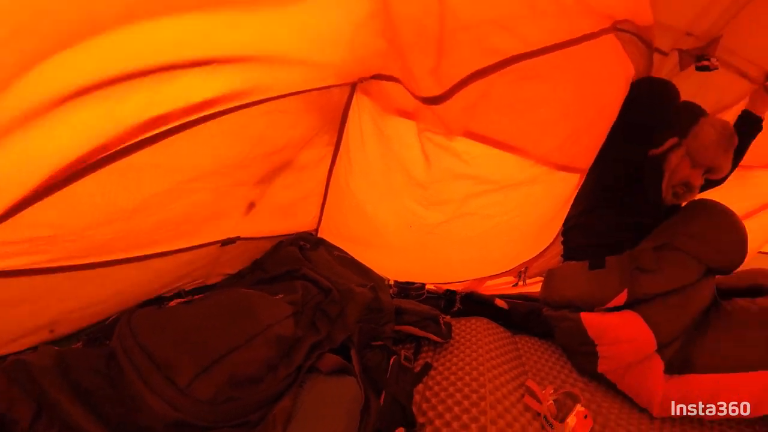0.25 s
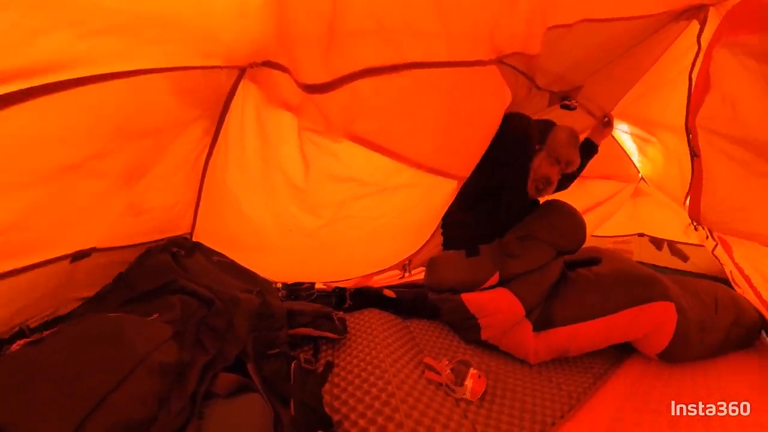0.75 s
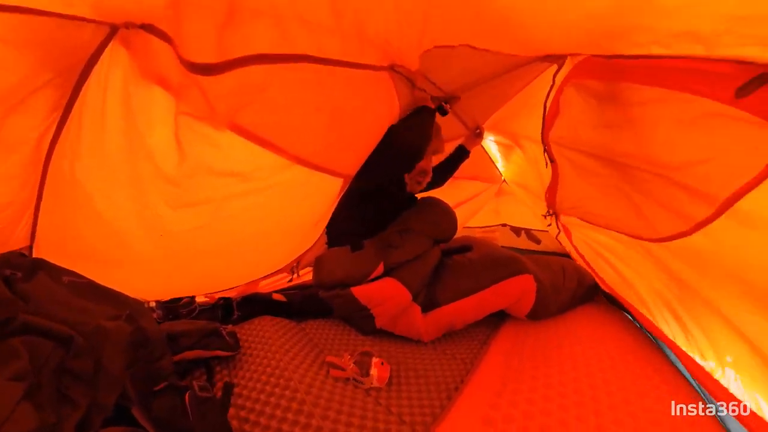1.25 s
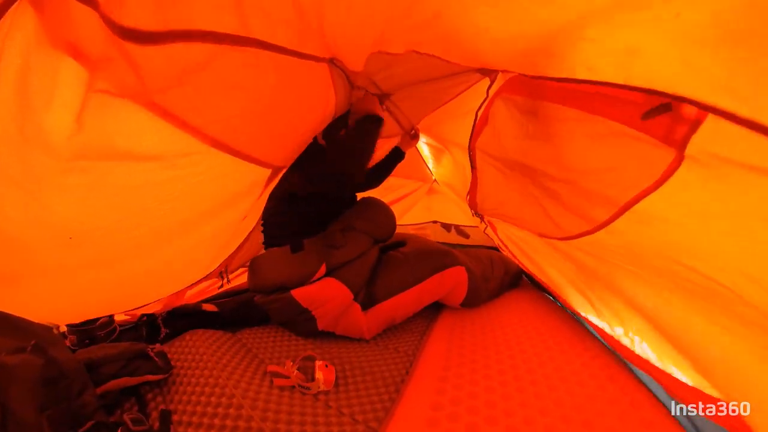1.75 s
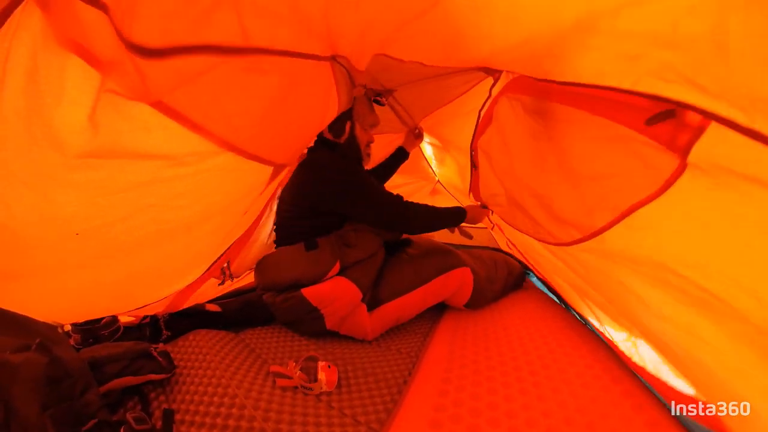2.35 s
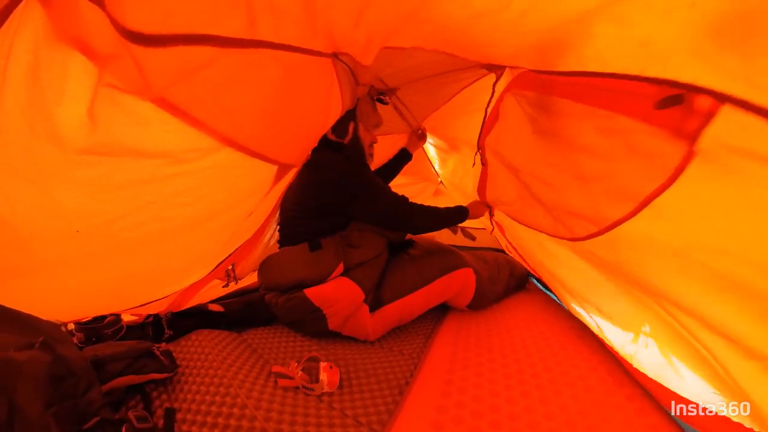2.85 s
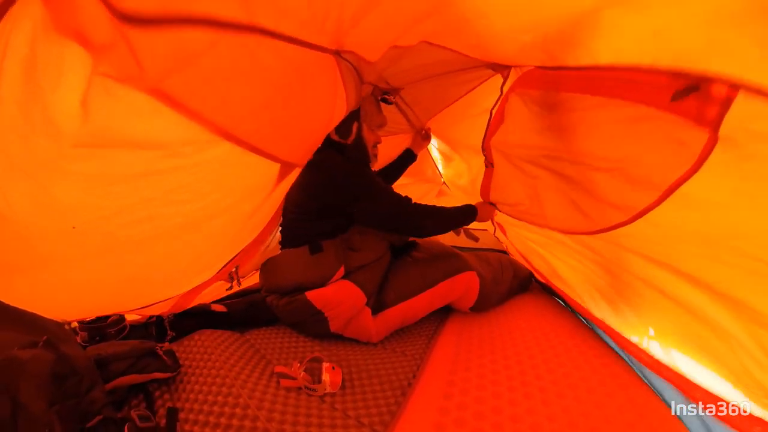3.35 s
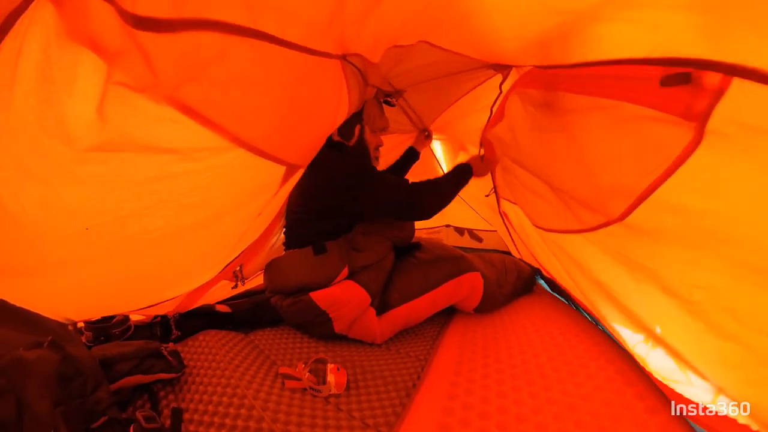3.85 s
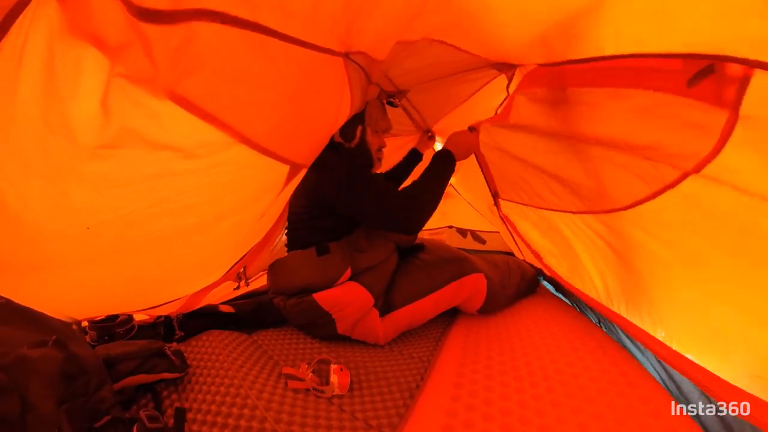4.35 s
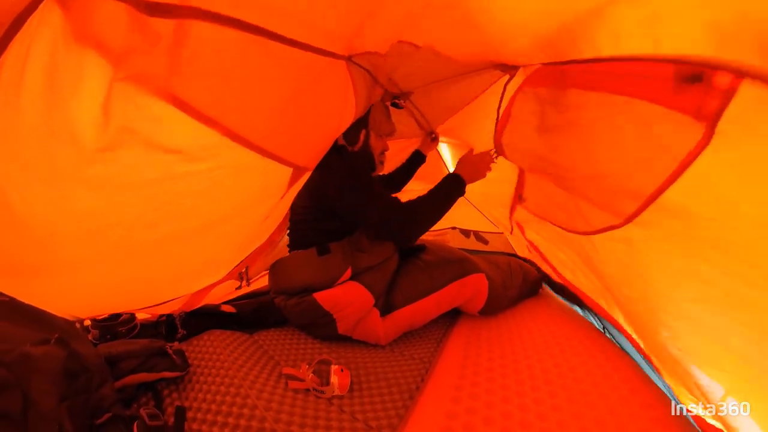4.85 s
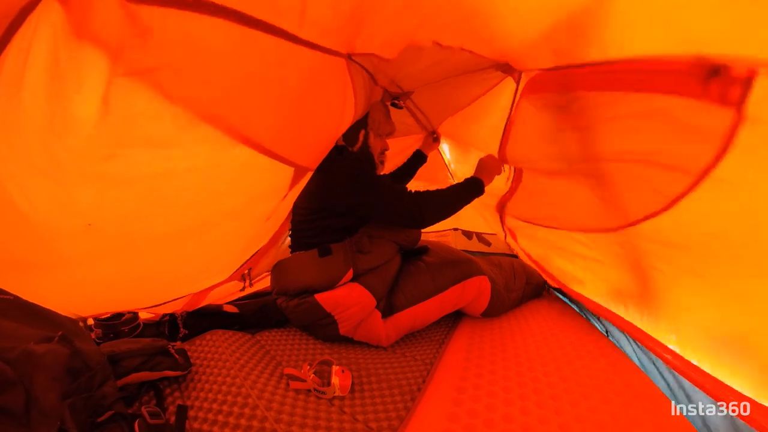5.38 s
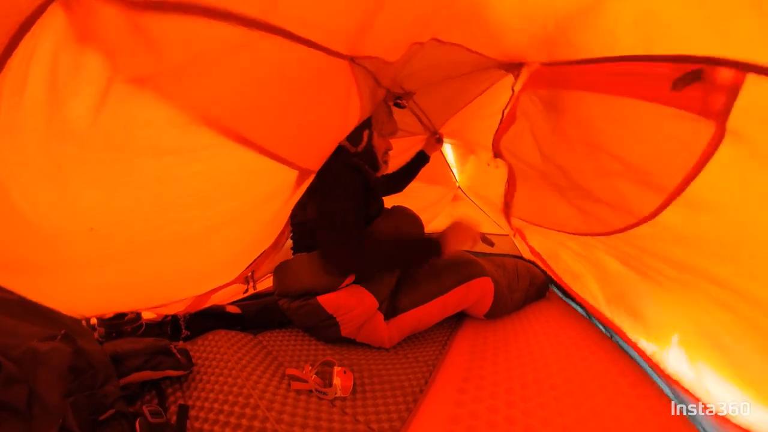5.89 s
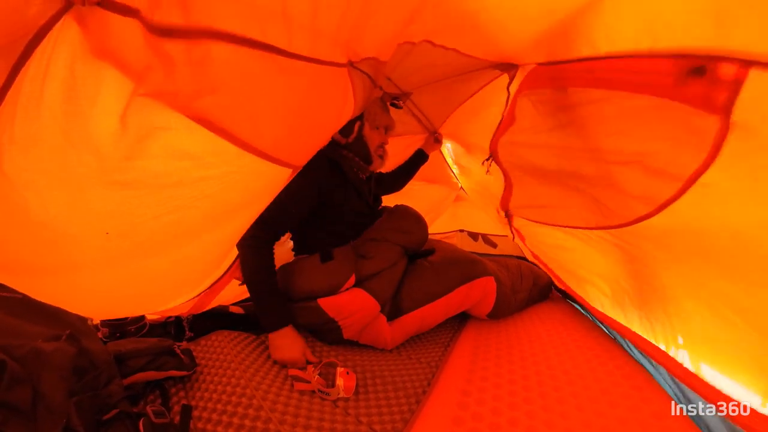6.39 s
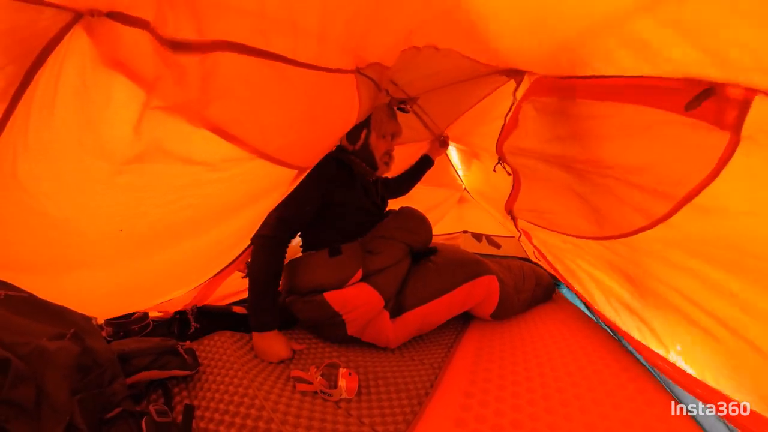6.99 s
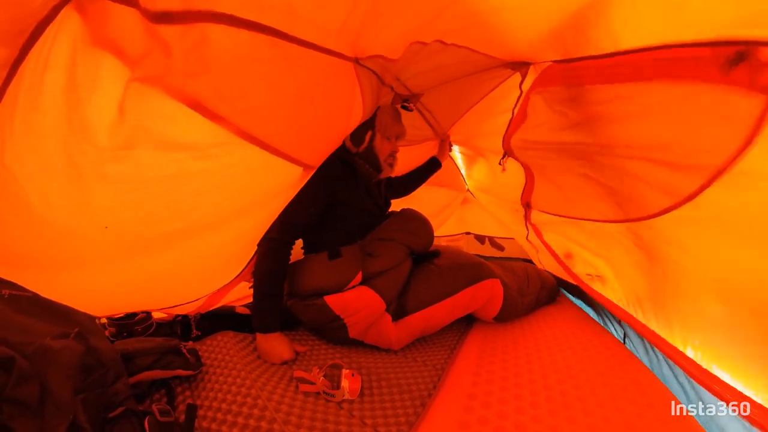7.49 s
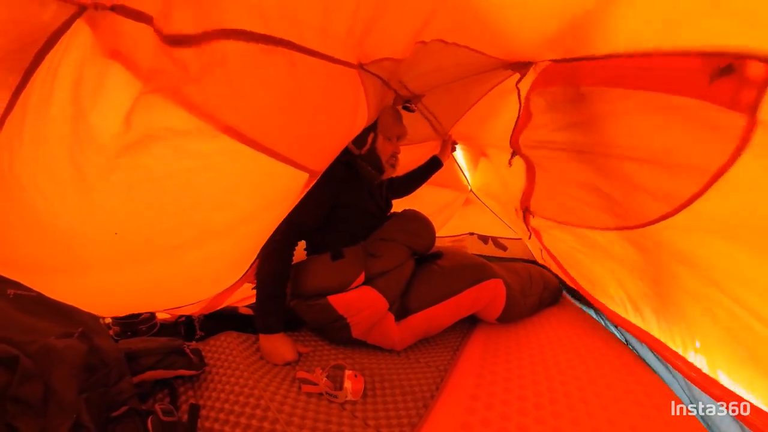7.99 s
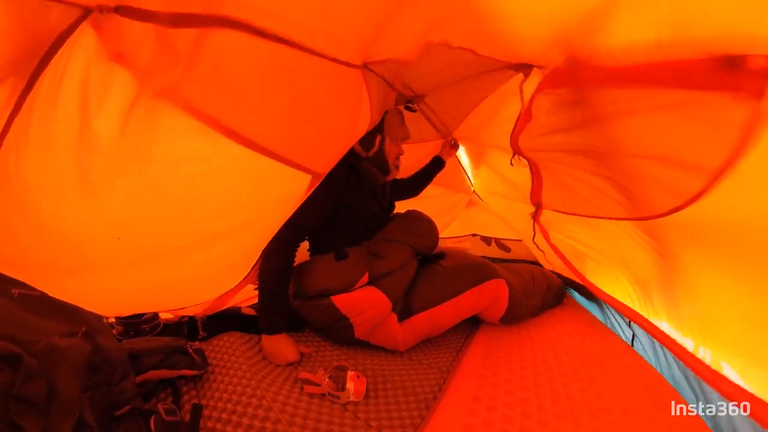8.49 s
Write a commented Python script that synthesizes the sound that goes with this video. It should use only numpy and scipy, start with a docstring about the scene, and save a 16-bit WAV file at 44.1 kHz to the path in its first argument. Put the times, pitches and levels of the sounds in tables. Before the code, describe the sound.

Inside a small tent in a gale, the slack fabric wall flaps about seven times a second. Dry snaps and cracks, soft low thumps of panels pulled taut and short crinkly rasps crowd together unevenly, with split-second hushes between. Low buffeting, faint wind rush and hiss lie beneath. The microphone is close, dry and slightly dull on top, with the flapping central and only the hiss wide.

```python
"""Gale on a small tent, heard from inside

The slack wall buffets and crinkles, rasping about seven times a second: noise mixed with random jerks, coloured
and swollen unevenly, with tiny ringing pops for the creases. Panels thrown taut thump as short pressure pulses
on a damped air spring. Folds whip open with dry snaps, each a knock, a crack and a rattle. Random ticks, low
rumble and a rush of wind fill in, and a hiss from 3 to 6 kHz spreads wide."""
import sys
import numpy as np
from scipy import signal
from scipy.fft import rfft, irfft
from scipy.io import wavfile

SR = 44100
rng = np.random.default_rng(int(sys.argv[2]) if len(sys.argv) > 2 else 0)


def waveform_to_disk(signal):
    """Save audio, clipped to [-1, 1], as 16-bit WAV at the path in sys.argv[1]."""
    frames = np.transpose(np.atleast_2d(signal))
    scaled = np.clip(frames, -1, 1) * 32767
    samples = np.round(scaled).astype(np.int16)
    wavfile.write(sys.argv[1], SR, samples)


N = 384993

# Panels thrown taut: strike_s, relative_peak_db, sharpness_hz
PANEL_THUMPS = [(0.0245, -10.5, 327.0), (0.3486, -8, 262.0), (0.4886, -8.5, 334.0), (0.7205, -18.5, 110),
                (0.757, -12.5, 397.0), (0.961, -16, 118.0), (1.0606, -13, 110.0), (1.133, -10, 188.0),
                (1.4228, -11.5, 230.0), (1.5873, -11, 196.0), (2.0079, -11, 306.0), (2.0651, -9.5, 320.0),
                (2.3129, -9.5, 106.0), (2.4591, -13.5, 260.0), (2.7224, -13.5, 260.0), (2.9835, -11, 226.0),
                (3.2047, -10.5, 186.0), (3.6388, -8.5, 342.0), (3.684, -9, 188.0), (3.869, -9.5, 167.0),
                (4.054, -12, 148.0), (4.1944, -12.5, 196.0), (4.4005, -16, 180), (4.589, -12, 420.0),
                (4.8683, -12, 107.0), (4.9962, -12.5, 130.0), (5.0818, -13.5, 350.0), (5.1781, -13, 306.0),
                (5.4263, -8, 327.0), (5.5102, -9.5, 327.0), (5.904, -17, 130.0), (5.989, -5, 359.0),
                (6.2053, -11.5, 150.0), (6.5257, -16, 150.0), (6.649, -12, 150.0), (6.7287, -10.5, 294.0),
                (6.8646, -10, 267.0), (7.1344, -9.5, 277.0), (7.2805, -14, 300), (7.2882, -13.5, 143.0),
                (7.6138, -5.5, 300.0), (7.728, -16.5, 155.0), (7.903, -14.5, 137.0), (7.9299, -12, 90.0),
                (8.0418, -12.5, 262.0), (8.105, -14, 432.0), (8.2038, -15, 148), (8.375, -15, 204.0),
                (8.645, -15, 313.0)]
# Folds whipping open: snap_s, relative_knock_db, relative_crack_db
FOLD_SNAPS = [(0.1486, -16.5, -26), (0.176, -35, -19.5), (0.3444, -13.5, -25), (0.4269, -51, -15),
              (0.736, -14.5, -27), (0.7507, -16, -27), (0.8837, -23, -25.5), (1.0813, -11, -6.5),
              (1.371, -12, -23), (1.405, -15, -16), (1.4369, -14.5, -28), (1.4909, -19, -48),
              (1.5651, -24, -22.5), (1.8512, -7, -34), (1.875, -17, -16.5), (2.1725, -20, -15.5),
              (2.31, -7.5, -26), (2.4584, -9.5, -24), (2.544, -18, -10.5), (2.5536, -15, -31),
              (2.589, -8.5, -17), (2.674, -13, -21.5), (2.7213, -15.5, -19.5), (2.7966, -20, -18),
              (2.836, -12.5, -27), (2.94, -5, -11.5), (3.049, -11, -27), (3.103, -14, -21),
              (3.1558, -13, -27), (3.1635, -12.5, -27), (3.6491, -3.5, -25), (3.817, -9.5, -21.5),
              (3.9389, -34, -17.5), (3.9809, -19, -44), (4.036, -12, -18.5), (4.0499, -7.5, -17),
              (4.119, -32, -20), (4.187, -7.5, -24.5), (4.3914, -3, -28), (4.5888, -22, -20),
              (4.6826, -13, -30), (4.7108, -22, -31), (4.8184, -5.5, -12), (4.842, -37, -18),
              (4.8655, -12.5, -26), (4.9612, -10, -22.5), (5.0815, -15.5, -17.5), (5.173, -14, -24),
              (5.2301, -14.5, -39), (5.4144, -25, -17.5), (5.4688, -20, -35), (5.51, -16.5, -26),
              (5.5517, -26, -33), (5.569, -16, -35), (5.7634, -10.5, -26), (5.811, -7.5, -49),
              (5.9003, -8, -39), (5.92, -15.5, -15), (5.934, -10, -48), (5.9895, -5, -55),
              (6.237, -28, -19), (6.3113, -48, -4), (6.418, -8, -48), (6.4857, -14.5, -25.5),
              (6.5244, -27, -19), (6.6467, -10, -30), (6.727, -15.5, -27), (6.8492, -20, -18.5),
              (6.9338, -18, -17.5), (6.9534, -9, -22), (7.0138, -9, -51), (7.1335, -18, -18.5),
              (7.2884, -3.5, -19), (7.6128, -13.5, -22.5), (7.7144, -11.5, -17.5), (7.779, -8.5, -20.5),
              (8.0903, -34, -25), (8.1054, -1.5, -32), (8.168, -23, -23), (8.1946, -17, -19),
              (8.2078, -22, -25), (8.275, -35, -18.5), (8.3726, -14, -30), (8.4264, -14, -13),
              (8.4466, -11, -20), (8.5188, -23, -19), (8.706, -40, -12.5)]
# Bursts of rasping as creases run through the cloth: middle_s, relative_level_db, length_s, brightness_db
CREASE_RASPS = [(0.01, -39.5, 0.012, -5), (0.174, -32.5, 0.014, 3), (0.337, -36.0, 0.0073, -3),
                (0.751, -31.5, 0.0061, -2), (0.827, -42, 0.012, -1), (0.901, -39.5, 0.017, -0.0),
                (1.129, -40.5, 0.0093, -3), (1.3, -49.5, 0.055, 5.5), (1.397, -38.5, 0.054, -1.5),
                (1.559, -35.0, 0.011, -3), (1.831, -37, 0.066, -2), (2.031, -34.5, 0.019, 3.5),
                (2.164, -28, 0.0018, 3), (2.295, -38, 0.027, -5), (2.425, -39, 0.018, 9.5),
                (2.574, -34.0, 0.012, 4), (2.693, -31.5, 0.0035, 3), (2.829, -40, 0.0038, 1.0),
                (2.943, -41.5, 0.032, -5), (3.083, -30.5, 0.012, 0), (3.171, -44, 0.011, -5),
                (3.364, -34, 0.011, -2.5), (3.627, -33, 0.005, 10), (3.817, -41.5, 0.024, -3.0),
                (3.942, -33.5, 0.017, -6.5), (3.99, -37, 0.019, -4.5), (4.184, -36.0, 0.0095, -1),
                (4.367, -39.5, 0.02, 5), (4.577, -33.5, 0.0074, 3), (4.706, -34.5, 0.018, -3.5),
                (4.8, -42, 0.027, -0.0), (4.846, -39, 0.012, 3), (4.985, -40, 0.017, 4),
                (5.073, -39.5, 0.0065, -8), (5.171, -33.5, 0.021, -6.5), (5.287, -37, 0.078, 0.5),
                (5.683, -45.5, 0.038, -9), (5.813, -41.0, 0.02, 6), (5.93, -31.5, 0.0074, -1),
                (5.958, -34, 0.0055, -6), (6.181, -44, 0.059, -3.5), (6.237, -36.0, 0.053, 6.5),
                (6.331, -36.5, 0.036, 0.5), (6.428, -40.5, 0.05, -1), (6.523, -30.5, 0.0034, -6),
                (6.628, -37, 0.035, -2), (6.723, -36.5, 0.01, 11), (6.842, -39.5, 0.02, 9),
                (6.95, -39.5, 0.028, 3), (7.047, -35, 0.025, 0), (7.413, -32, 0.0056, -0.5),
                (7.511, -42, 0.005, 18), (7.716, -37, 0.0081, 8), (7.806, -41.5, 0.022, -11),
                (7.929, -35.5, 0.0047, -4.0), (8.026, -40, 0.023, -7), (8.188, -37, 0.014, 3),
                (8.283, -40.5, 0.016, -3.5), (8.369, -41, 0.015, 9), (8.449, -35.5, 0.026, -2.5),
                (8.545, -34.5, 0.033, 12.5), (8.635, -33, 0.06, 0)]
# Wind strength between flaps: time_s, relative_buffet_db, relative_crinkle_db
WIND_GUSTS = [(0.0, -36.5, -49), (0.95, -31, -54.5), (1.92, -32.5, -48.5), (2.14, -39, -52),
              (3.01, -33.5, -44), (3.21, -34.5, -55), (3.77, -33.5, -44), (4.35, -29, -52.5),
              (5.15, -37.5, -50.5), (6.15, -32.5, -49), (7.03, -38.5, -55.5), (7.78, -30, -47),
              (8.24, -37, -54), (8.73, -33.5, -45)]
# Wall stays taut and goes quiet, then slackens again: start_s, depth_db, recovery_s
TAUT_LULLS = [(0.04, 17, 0.059), (1.13, 16.5, 0.61), (2.08, 11, 0.074), (2.74, 11.5, 0.15),
              (3.21, 17.5, 0.13), (3.702, 15.5, 0.091), (4.07, 11, 0.15), (4.21, 14, 0.14),
              (4.609, 21, 0.053), (5.518, 18, 0.14), (5.72, 21, 0.069), (6.0, 12.5, 0.46),
              (7.15, 10, 0.053), (8.11, 9.5, 0.095), (8.22, 20, 0.033)]
# Colour of the low buffeting: frequency_hz, relative_level_db (per Hz)
BUFFET_COLOUR = [(20, -29.5), (48, -2.5), (87, 2), (200, -8.5), (500, -14), (1200, -28), (3000, -39.5)]
# Colour of the bright crinkle and the rush: frequency_hz, relative_level_db (per Hz)
CRINKLE_COLOUR = [(300, 10.5), (800, 4), (1700, -6), (3500, -7), (5800, -15), (8000, -4.5)]
# Colour of the wind pressure on the whole tent: frequency_hz, relative_level_db (per Hz)
RUMBLE_COLOUR = [(20, -13), (45, -5.5), (80, -10), (150, -20.5), (300, -50.5)]

CUTOFF_HZ = 9700
HUSH_S, LULL_LOW_SHARE = 0.014, 0.61  # time constant of going quiet; share of the depth felt by the buffeting
# Each rasp heaves the panel: level offset, share of the rasp's level swing, delay and added length
HEAVE_ABOVE_DB, HEAVE_FOLLOWS, HEAVE_LAG_S, HEAVE_EXTRA_S = 8.5, 0.55, 0.007, 0.013


def amp(db):
    """Decibels to gain."""
    return 10 ** (np.asarray(db) / 20)


def rms_one(x):
    """Scale to unit rms."""
    return x / np.sqrt(np.mean(x ** 2) + 1e-20)


def drift(rate_hz):
    """Slow chance of unit rms: noise twice through a one-pole low-pass, made at a tenth of the rate."""
    r = np.exp(-20 * np.pi * rate_hz / SR)
    noise = rng.standard_normal(N // 10 + 4002)
    slow = signal.lfilter([1], [1, -2 * r, r * r], noise)[4000:]  # drop the settling
    return np.interp(np.arange(N) / 10, np.arange(len(slow)), rms_one(slow))


def grains(per_s, spread_db):
    """Random clicks of either sign, mostly small, a few large, with unit rms."""
    sizes = amp(spread_db * np.minimum(rng.exponential(1, N), 3))
    signed = sizes * rng.choice([-1, 1], N)
    return rms_one(signed * (rng.random(N) < per_s / SR))


def coloured(x, spectrum):
    """Give a white signal the spectrum, causally (minimum phase), with unit rms."""
    size = 2 ** 14
    hz, level_db = np.transpose(spectrum)
    grid_hz = np.maximum(np.arange(size // 2 + 1) * SR / size, 1)
    grid_db = np.interp(np.log(grid_hz), np.log(hz), level_db)
    cepstrum = irfft(np.log(amp(grid_db)))
    # Fold the cepstrum forward in time for minimum phase
    cepstrum[1:size // 2] *= 2
    cepstrum[size // 2:] = 0
    impulse = irfft(np.exp(rfft(cepstrum)))
    return rms_one(signal.fftconvolve(x, impulse)[:N])


def add(out, s, sound):
    """Mix in a short sound; out has a 200-sample lead-in, so the sound's sample 200 falls at time s."""
    at = round(s * SR)
    out[at:at + len(sound)] += sound


def shaken_cloth(level_db, spectrum, per_s, spread_db, grain_share, flicker_db):
    """Air noise mixed with small jerks of the cloth, swelling unevenly."""
    air = np.sqrt(1 - grain_share) * rng.standard_normal(N)
    jerks = np.sqrt(grain_share) * grains(per_s, spread_db)
    return amp(level_db) * coloured((air + jerks) * amp(flicker_db), spectrum)


def buffet_level(calm_db):
    """The low buffeting between flaps, heaving with every rasp; dB."""
    power, t = amp(2 * calm_db), np.arange(N) / SR
    for s, level_db, length, _ in CREASE_RASPS:
        near = slice(max(round((s - .15) * SR), 0), round((s + .2) * SR))
        late = t[near] - s - HEAVE_LAG_S
        lean = np.where(late < 0, 3, 1.5)  # comes faster than it goes
        heave_db = HEAVE_FOLLOWS * (level_db + 36) - 36 + HEAVE_ABOVE_DB
        power[near] += amp(2 * heave_db) * np.exp(-(lean * late / (length + HEAVE_EXTRA_S)) ** 2)
    return 10 * np.log10(power)


def buffeting(buffet_db, gusts):
    """The slack wall beats the air: low noise and jerks that swell with the gusts, within limits."""
    flicker_db = 5.9 * np.tanh(.5 * gusts + 0.34 * drift(18.0))
    return shaken_cloth(buffet_db + 2.5, BUFFET_COLOUR, per_s=250.0, spread_db=3.5,
                        grain_share=0.44, flicker_db=flicker_db)


def crinkle_level(slack_db):
    """Crinkle between flaps, each rasp swelling out in its own colour; level dB, brightness dB."""
    power, bright, t = amp(2 * slack_db), np.zeros(N), np.arange(N) / SR
    for s, level_db, length, bright_db in CREASE_RASPS:
        near = slice(max(round((s - .15) * SR), 0), round((s + .15) * SR))
        lean = np.where(t[near] < s, 2.2, .75)  # a rasp starts faster than it dies
        shape = np.exp(-.9 * np.abs(2 * lean * (t[near] - s) / length) ** 1.24)
        swell = amp(2 * level_db) * shape
        power[near] += swell
        bright[near] += bright_db * swell
    return 10 * np.log10(power), bright / power


def crinkling(crinkle_db, flicker_db):
    """The cloth rubs and creases: bright noise and jerks that flicker fast."""
    return shaken_cloth(crinkle_db + 6.5, CRINKLE_COLOUR, per_s=800.0, spread_db=6.0,
                        grain_share=0.36, flicker_db=flicker_db)


def crackle(level_db, per_s, spread_db, tilt_db, cycles):
    """Tiny creases pop all over the cloth, each at one of eight pitches, ringing a cycle or so."""
    pops, dealt, out = grains(per_s, spread_db), rng.integers(0, 8, N), 0
    for k, hz in enumerate(np.geomspace(400, 6000, 8)):
        r, w = np.exp(-hz / cycles / SR), 2 * np.pi * hz / SR
        struck = pops * (dealt == k) + 1e-18
        ring = signal.lfilter([np.sin(w)], [1, -2 * r * np.cos(w), r * r], struck)
        out = out + amp(tilt_db * k) * ring
    return amp(level_db) * rms_one(out)


def patchy(x, bright_db, patch_db, rate_hz):
    """The rasping shifts colour: four bands tilt with brightness and swell and fade independently."""
    out, rest = 0, x
    for edge_hz, share in ((900, -1), (1900, -0.067), (3800, 0.81)):
        below = signal.lfilter(*signal.butter(1, edge_hz, fs=SR), rest)
        out = out + below * amp(share * bright_db + patch_db * drift(rate_hz))
        rest = rest - below
    return out + rest * amp(.5 * bright_db + patch_db * drift(rate_hz))


def lull_level():
    """A taut wall hushes: each lull drops fast, lingers and climbs back; dB."""
    out, t = np.zeros(N), np.arange(N) / SR
    for s, depth_db, recovery in TAUT_LULLS:
        near = slice(round(s * SR), round((s + recovery) * SR))
        late = np.maximum(t[near] - s, 0)
        drop = 1 - np.exp(-late / HUSH_S)
        climb = 1 - (late / recovery) ** 1.42
        out[near] -= depth_db * drop * climb
    return out


def thumps(rebound_hz, damping):
    """A panel bulges in, then jerks out, pulling air quickly; the tent's air spring swings back slowly."""
    out, t = np.zeros(N + 600), (np.arange(600) - 200) / SR
    for s, peak_db, hz in PANEL_THUMPS:
        pull = np.exp(-np.abs(t * hz * np.where(t < 0, 12, 6)) ** 1.5)  # quicker to come than to go
        bulge = .3 * np.exp(-(4 * t * hz + 1) ** 2)
        add(out, s, amp(peak_db + 0.5) * (bulge - pull))
    w = 2 * np.pi * rebound_hz
    spring = signal.bilinear([1, 0, 0], [1, 2 * damping * w, w * w], SR)
    return signal.lfilter(*spring, out[200:N + 200])


def snaps():
    """A fold knocks for about a cycle and cracks needle-sharp, repeats unevenly, and rattles."""
    out, t = np.zeros(N + 1200), (np.arange(1200) - 200) / SR
    after = np.maximum(t, 0)
    for s, knock_db, crack_db in FOLD_SNAPS:
        chance = rng.standard_normal(3)
        slips, hiss = rng.standard_normal((2, len(t)))
        knock_hz, crack_hz = [900, 4700] * amp(1.5 * np.clip(chance[:2], -2, 2))
        # A fold with little crack knocks deeper
        knock_hz *= amp(0.08 * np.clip(crack_db - knock_db + 9, -25, 0))
        lean = np.where(t < 0, 3.5, 1.8)  # a sharp push, a longer pull
        knock = -np.sin(2 * np.pi * knock_hz * t) * np.exp(-(t * knock_hz * lean) ** 2)
        crack = -np.sin(2 * np.pi * crack_hz * t) * np.exp(-(t * crack_hz * 2.33) ** 2)
        blow = amp(knock_db - 4.0) * knock + amp(crack_db + 3.5) * crack
        # Rare random slips repeat the blow, fading as the fold runs out
        fade = np.exp(-np.arange(len(t)) / SR / 0.0037) * amp(-6.5)
        repeats = np.sign(slips) * (np.abs(slips) > 2.6) * fade
        repeats[0] = 1
        dull = rms_one(signal.lfilter(*signal.iirpeak(1.77 * knock_hz, 1.0, SR), hiss))
        bright = rms_one(signal.lfilter(*signal.iirpeak(crack_hz, 0.8, SR), hiss))
        rattle = dull * amp(knock_db - 19.5) + bright * amp(crack_db - 14.5)
        # The cloth starts to rasp just before it snaps
        decay_s = 0.0031 * amp(2 * chance[2])
        swell = np.exp(-after / decay_s + np.minimum(t, 0) / 0.00033)
        add(out, s, np.convolve(blow, repeats)[:len(t)] + rattle * swell)
    return out[200:N + 200]


def ticks(level_db, per_s, spread_db, rattle_s):
    """Lesser folds flick open at random: a sharp start, then a short rattle, in three colours."""
    out, r = 0, np.exp(-1 / (rattle_s * SR))
    for band_hz in ([700, 2800], [1500, 2070], [3000, 16000]):
        flicks = np.abs(grains(per_s / 3, spread_db)) + 1e-18
        swell = signal.lfilter([1], [1, -r], flicks)
        rattle = swell * rng.standard_normal(N)
        out = out + rms_one(signal.lfilter(*signal.butter(1, band_hz, "band", fs=SR), rattle))
    return amp(level_db) * rms_one(out)


def wind_rumble(buffet_db):
    """Wind pressure on the whole tent: deep noise that follows the buffeting level."""
    return amp(buffet_db - 4.0) * coloured(rng.standard_normal(N), RUMBLE_COLOUR)


def wind_rush(slack_db):
    """Wind streaming past outside: crinkle-coloured noise that moves less than the cloth."""
    return amp(0.56 * (slack_db + 51.5) - 59.0) * coloured(rng.standard_normal(N), CRINKLE_COLOUR)


def wide_hiss(crinkle_db, flicker_db):
    """Band noise around 3 to 6 kHz, flickering with the crinkle and following half its level in dB."""
    band = signal.cheby2(8, 50, [2900, 6400], "band", fs=SR, output="sos")
    hiss = signal.sosfilt(band, rng.standard_normal(N) * amp(flicker_db))
    return rms_one(hiss) * amp(.5 * crinkle_db - 38)


def scene():
    """Cloth, thumps, snaps and ticks over rumble and rush in the middle; only the hiss has width."""
    s, calm_db, slack_db = np.transpose(WIND_GUSTS)
    t, lull_db = np.arange(N) / SR, lull_level()
    calm_db = np.interp(t, s, calm_db)
    slack_db = np.interp(t, s, slack_db) + lull_db
    buffet_db = buffet_level(calm_db + LULL_LOW_SHARE * lull_db)
    crinkle_db, bright_db = crinkle_level(slack_db)
    gusts = drift(55.0)  # the whole wall shudders together
    flicker_db = 2 * gusts + 2 * drift(130.0)

    buffet = buffeting(buffet_db, gusts)
    crinkle = crinkling(crinkle_db, flicker_db)
    pops = crackle(crinkle_db + 3.0 + 2.0 * gusts, per_s=900.0, spread_db=6.0, tilt_db=-1.0, cycles=1.1)
    cloth = patchy(crinkle + pops + wind_rush(slack_db), bright_db, patch_db=4.0, rate_hz=19.0)
    strikes = thumps(rebound_hz=67.0, damping=0.34) + snaps()
    tick_db = 0.85 * (crinkle_db + 44.5) - 47.0
    flicks = ticks(tick_db, per_s=120.0, spread_db=5.5, rattle_s=0.0026)
    mid = buffet + cloth + strikes + flicks + wind_rumble(buffet_db)
    side = wide_hiss(crinkle_db, flicker_db)
    return mid + side * np.array([[1], [-1]])  # opposite polarity left and right


def record(dry):
    """The microphone rolls off steeply above the presence range; the top is cut."""
    dull = signal.sosfilt(signal.butter(10, 6400, fs=SR, output="sos"), dry)
    return signal.sosfilt(signal.cheby2(10, 20, CUTOFF_HZ, fs=SR, output="sos"), dull)


dry = scene()
out = record(dry)
waveform_to_disk(out)
```